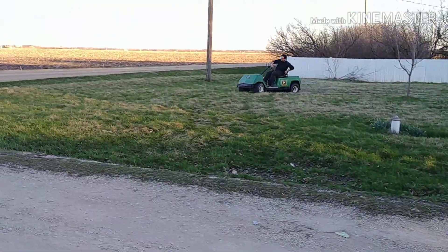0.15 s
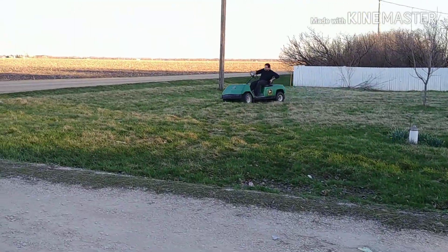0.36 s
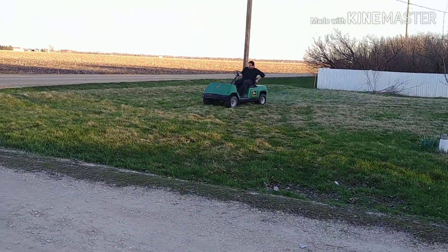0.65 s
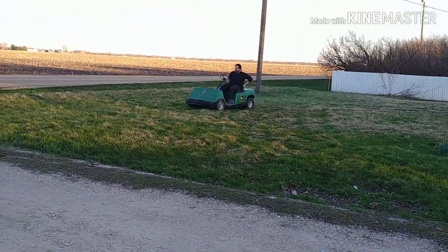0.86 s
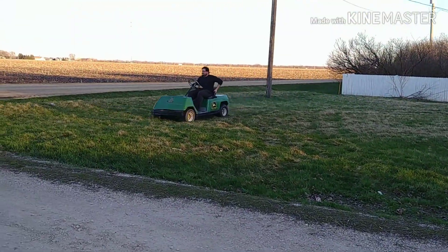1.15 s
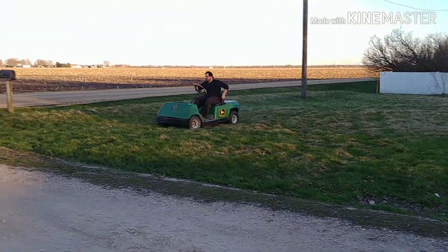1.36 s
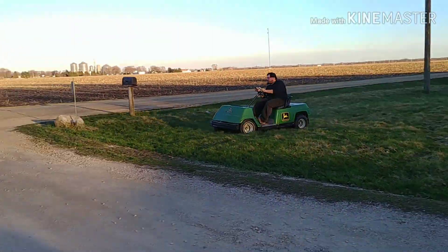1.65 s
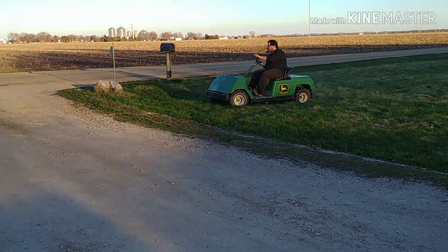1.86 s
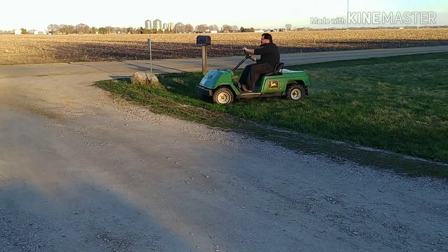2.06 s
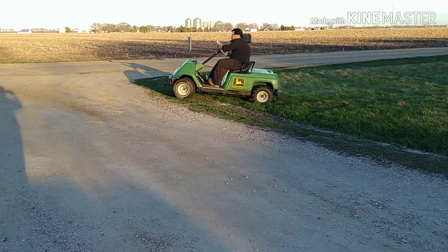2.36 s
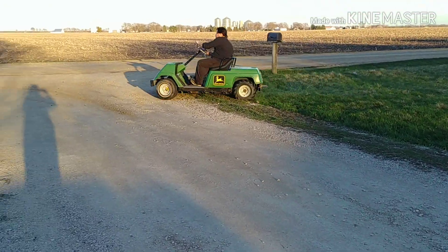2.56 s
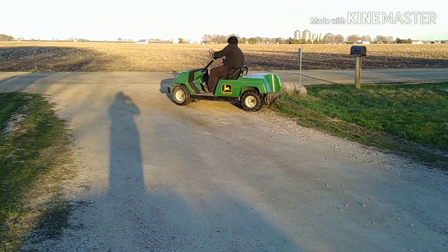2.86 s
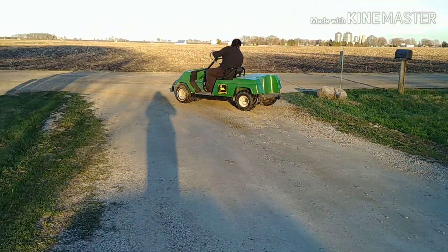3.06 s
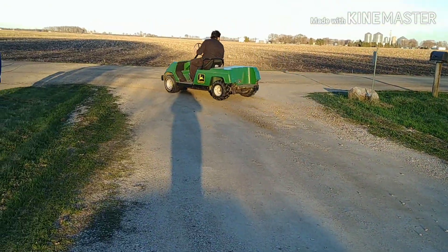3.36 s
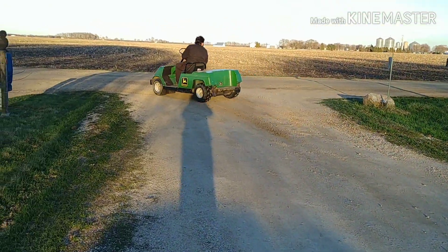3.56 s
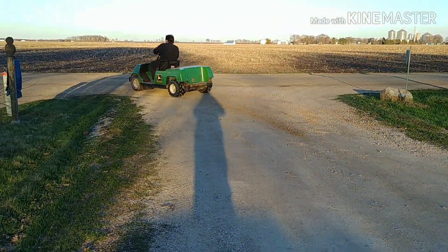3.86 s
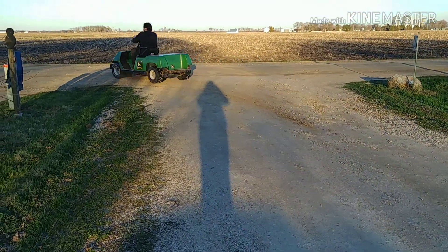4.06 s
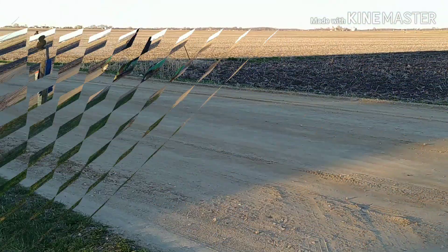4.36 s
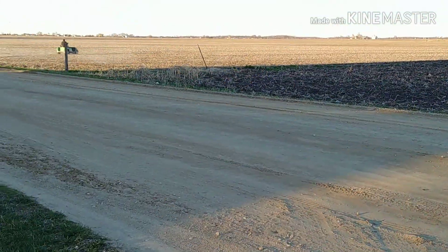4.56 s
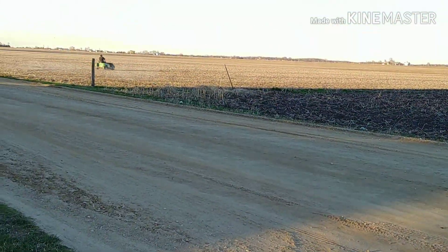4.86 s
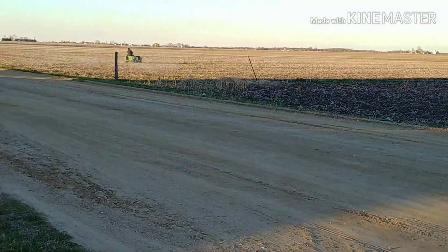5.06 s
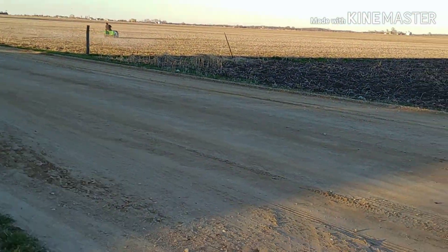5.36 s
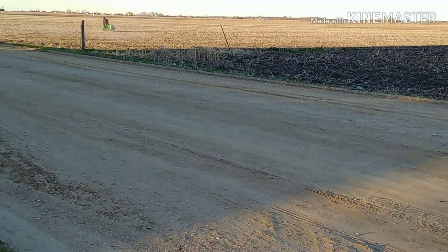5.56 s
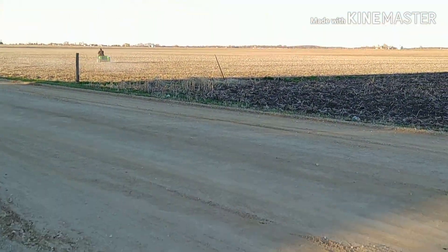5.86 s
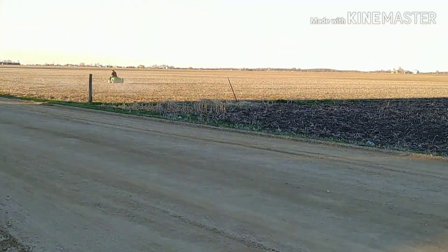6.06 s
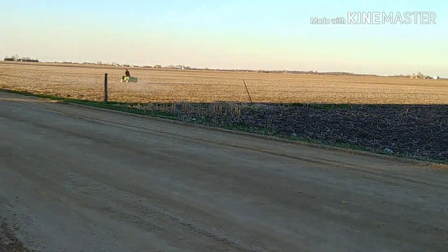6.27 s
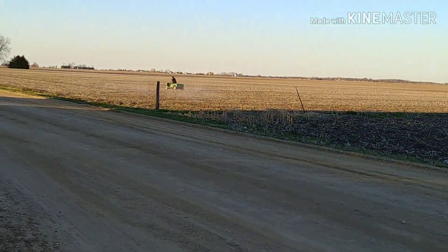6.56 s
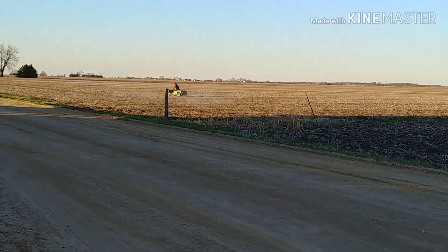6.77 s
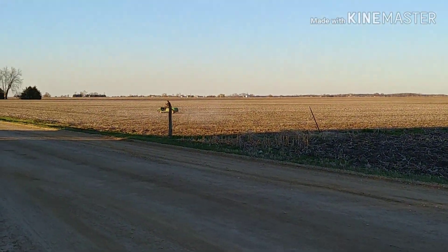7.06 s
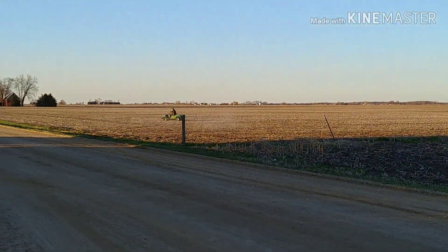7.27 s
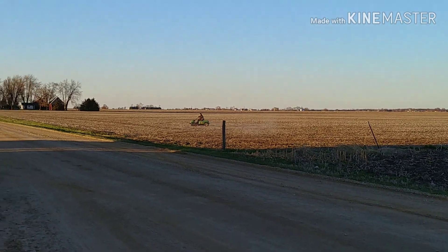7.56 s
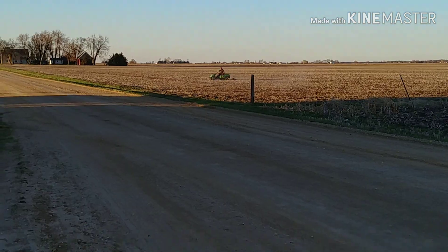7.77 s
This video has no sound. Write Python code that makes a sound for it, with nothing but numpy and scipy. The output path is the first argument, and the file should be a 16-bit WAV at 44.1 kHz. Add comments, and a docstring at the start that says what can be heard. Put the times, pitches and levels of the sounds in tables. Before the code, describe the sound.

Outdoors in open farmland, a small two-stroke cart starts high and raspy, then slows through short throttle blips, with hollow muffler pops between them. Tyres scuff gravel as it turns nearby, then it pulls away, revs climbing. The sound blends into a farther, softer drive: popping as it slows, one long rising pull, a second burst, then coasting with faint pops. A handheld microphone stays put, with a light breeze and early low rumble.

```python
"""On grass and gravel, a two-stroke golf cart is driven hard, then is heard farther off beside a field.
On the throttle its single cylinder fires every turn: sine waves make the note, pulses and noise the rasp.
Off the throttle it coasts on a soft hum; late charges make separate pops, each a snap, a thump and a ring.
Tyres scuff the gravel in short swells of grainy noise, and shaped noise makes a light breeze and a rumble.
The near drive fades into the far one."""
import sys
import numpy as np
from scipy import signal
from scipy.fft import rfft, irfft, next_fast_len
from scipy.io import wavfile
from scipy.ndimage import uniform_filter1d, minimum_filter1d, map_coordinates

SR = 44100
rng = np.random.default_rng(int(sys.argv[2]) if len(sys.argv) > 2 else 0)


def master(y):
    """Save y as 16-bit WAV."""
    cut = np.clip(np.atleast_2d(y).T, -1, 1)
    pcm = np.round(cut * 32767)  # scale
    wavfile.write(sys.argv[1], SR, pcm.astype(np.int16))


N = 348831
FADE_S = 4.75  # from here the far drive takes over

# How fast the crank spins. Each row: time in seconds, speed in turns a second.
NEAR_SPEED = [(0.0, 162.5), (0.12, 129), (0.2, 124), (0.37, 135.7), (0.66, 156.4), (0.98, 114.4),
              (1.2, 108.9), (1.59, 101.4), (1.88, 93.8), (1.92, 99), (2.21, 93), (2.33, 105), (2.46, 117.8),
              (2.57, 95), (2.67, 95.3), (2.84, 91), (2.95, 83.6), (3.1, 85.1), (3.2, 105.4), (3.32, 114),
              (3.54, 89.6), (3.84, 92.5), (4.02, 98.3), (4.29, 108.4), (4.56, 131.5), (4.75, 139.4)]
FAR_SPEED = [(4.75, 95.7), (5.51, 84.67), (6.04, 79.99), (6.3, 101.9), (6.55, 114.5), (6.85, 127.5),
             (6.96, 107), (7.2, 125.2), (7.32, 125.7), (7.56, 101.3), (7.72, 91.5), (7.78, 94.2),
             (7.83, 92.4), (7.91, 99.5)]
# Colour of the muffler's thump. Each row: frequency in Hz, level in dB.
THUMP = [(18, -55.5), (30, -62), (76, 2.5), (194, 2.5), (227, 4), (260, 1.5), (360, -1.5), (468, -16.5),
         (521, -19), (678, -25), (1200, -67.5), (1560, -91), (2640, -120)]


def amp(db):
    """Turn dB into a plain factor."""
    return 10 ** (np.asarray(db) / 20)


def unit(x):
    """Scale a sound to an RMS level of 1."""
    return x / np.sqrt(np.mean(x ** 2) + 1e-20)


def along(points, hz):
    """Read a curve of (Hz, value) points on a log frequency axis."""
    f, v = np.transpose(points)
    return np.interp(np.log(hz + 1), np.log(f + 1), v)


def curves(rows):
    """Give one value per sample for each column after the time."""
    s, *cols = np.transpose(rows)
    return [np.interp(np.arange(N) / SR, s, c) for c in cols]


def wobble(rate):
    """Draw a smooth random curve through rate random points a second."""
    return map_coordinates(rng.standard_normal(int(N * rate / SR) + 4), [np.arange(N) * rate / SR])


def filtered(x, response):
    """Multiply the spectrum of x by a response that depends on frequency."""
    m = next_fast_len(N + SR // 2)
    return irfft(rfft(x, m) * response(np.fft.rfftfreq(m, 1 / SR)), m)[..., :N]


def ring(points, size=8192):
    """Make the ring of a colour after a single tap, peak 1; it falls steeply outside the points."""
    hz = np.fft.rfftfreq(size, 1 / SR)
    closed = [(points[0][0] / 2, -80), *points, (points[-1][0] * 2, -90)]
    # folding the cepstrum makes the ring start at the tap, never before it
    cepstrum = irfft(np.log(amp(along(closed, hz))))
    cepstrum[1:size // 2] *= 2
    cepstrum[size // 2 + 1:] = 0
    h = irfft(np.exp(rfft(cepstrum)))
    return h / np.abs(h).max()


def through(x, points):
    """Let each channel of x ring a colour."""
    return signal.fftconvolve(x, ring(points)[None], axes=1)[:, :N]


def stereo(pair):
    """Mix two unrelated signals into left and right, which grow less alike towards the treble."""
    # Likeness of left and right. Each row: frequency in Hz, likeness from 0 to 1.
    alike = [(30, .6), (80, .96), (200, .99), (500, .96), (1000, .87), (2000, .75), (4000, .2), (9000, .1)]
    turn = lambda hz: np.arccos(np.clip(along(alike, hz), -1, 1)) / 2
    mid, side = filtered(pair, lambda hz: np.array([np.cos(turn(hz)), np.sin(turn(hz))]))
    return np.array([mid + side, mid - side])


def panels(x, t60, count=20, size=1024):
    """Body panels and ground smear each pulse into a noisy tail; the paths change as the cart moves."""
    out, place = np.zeros((2, N + size)), np.linspace(0, count - 1, N)
    for k in range(count):
        # t60: seconds for the tail to fall by 60 dB
        tail = rng.standard_normal((2, size)) * amp(-60 * np.arange(size) / SR / t60)
        near = np.flatnonzero(np.abs(place - k) < 1)
        part = x[near] * np.cos(np.pi / 2 * (place[near] - k))  # fade from one tail to the next
        out[:, near[0]:near[-1] + size] += signal.fftconvolve(part[None], unit(tail), axes=1)
    return out[:, :N]


def open_air(air_db=-42, rumble_db=-50, hiss_db=-72):
    """Shape noise into a light breeze over the fields, a low rumble that sinks, and a faint hiss."""
    # Colour of the breeze. Each row: frequency in Hz, level in dB.
    breeze_colour = [(15, -63), (25, -25.5), (98, -20), (251, -10.5), (374, 6), (456, -12), (556, -4),
                     (1060, -56.5), (3760, -79), (7530, -73), (9420, -70), (12200, -105), (20700, -120)]
    noise = lambda colour: unit(stereo(through(rng.standard_normal((2, N)), colour)))
    course_db, = curves([(0, 25.5), (4, 8), (4.7, -13), (7.9, -14.5)])
    rumble_level = amp(rumble_db + course_db + 0.83 * wobble(4.8))
    rumble = rumble_level * noise([(18, -4.5), (45, -2.5), (120, -3.5)])
    hiss = amp(hiss_db) * noise([(1000, -16.5), (4000, -7), (8000, 9.5), (10000, -4.5), (15000, -12)])
    breeze = amp(air_db + wobble(2.0)) * noise(breeze_colour)
    return breeze + rumble + hiss


def gravel(grainy_db=3):
    """The tyres scuff the gravel in the turn: each scuff is a swell of small stones grinding together."""
    # The scuffs. Each row: middle in seconds, length in seconds, level in dB.
    scuffs = [(2.146, .04, -32.5), (2.356, 0.36, -34.5), (2.583, 0.22, -30.5), (2.731, .07, -31.5)]
    colour = [(2500, -21.5), (4500, -3.5), (6000, 0), (7800, 2.5), (9000, -16.5), (10000, -32), (15000, -28.5)]
    t, swell = np.arange(N) / SR, np.zeros(N)
    for middle, length, db in scuffs:
        swell += amp(db) * np.cos(np.pi * np.clip((t - middle) / length, -.5, .5)) ** 2
    grains = rng.standard_normal((2, N)) * amp(grainy_db * wobble(900))
    return swell * unit(stereo(through(grains, colour)))


def pops(thump_db=-2.0, smear_db=-9, smear_s=.07, snap_db=-5, size=3000):
    """A late charge fires alone: a snap at the port, its scatter, then a thump and a ring of the muffler."""
    # Late charges, single or in a run on every second turn.
    # Each row: start in seconds, level in dB, number of firings.
    late_charges = [(0.223, 5, 2), (0.869, 5.5, 1), (0.942, 5.5, 1), (0.982, -0.5, 1), (1.003, 4, 1),
                    (1.118, 5, 1), (1.165, 1, 1), (1.267, 0.5, 2), (1.445, 0.5, 1), (1.6, -1.5, 1),
                    (1.756, 4, 1), (1.864, 1, 2), (2.04, 5.5, 1), (2.073, 7, 1), (2.213, 9.5, 1),
                    (2.602, 0.5, 2), (2.774, 3, 1), (2.817, -0.5, 1), (2.851, 0, 1), (2.979, -1, 2),
                    (3.016, 3.5, 1), (3.086, -1, 1), (3.447, 6.5, 2), (3.599, 6, 2), (3.754, 6, 1),
                    (4.814, -5.5, 1), (4.969, -7, 2), (5.115, -4.5, 2), (5.149, -1, 1), (5.287, -2.5, 1),
                    (5.297, 0, 1), (5.318, -6, 1), (5.4, -4.5, 2), (5.482, -2, 1), (5.566, -2, 1),
                    (5.603, -2.5, 2), (5.686, -3, 2), (5.747, -5, 2), (5.834, -3, 1), (5.895, -3.5, 2),
                    (5.958, -5, 2), (6.046, -6, 1), (7.453, -7.5, 1), (7.479, -9.5, 1), (7.569, -9, 2),
                    (7.643, -7, 1), (7.743, -7.5, 1), (7.845, -9.5, 1)]
    # The ring and crack carry only a short way.
    # Each row: time in seconds, shell level in dB against the thump, crack level in dB against the charge.
    reach = [(.9, -14, -18), (1.4, -20.5, -22.5), (2.1, -18, -25), (2.6, -4.5, -21), (2.85, -12.5, -15),
             (3, -7.5, -11), (3.7, -15, -12), (4.9, -13.5, -39.5), (5.3, -14, -24), (5.7, -26, -45),
             (7.6, -26.5, -28)]
    # Colours of the near and the far shell's ring, and of the crack. Each row: frequency in Hz, level in dB.
    near_shell = [(560, -26), (720, -7), (870, 0), (1020, -11), (1400, -20), (2050, -19), (2700, -38)]
    far_shell = [(330, -7), (520, 2.5), (680, -3.5), (900, -7), (1100, -20.5), (2000, -28), (2700, -37)]
    crack_colour = [(500, -3), (900, -1.5), (1400, -2), (2100, -1), (2700, -17.5), (4000, -26),
                    (8000, -26.5), (10000, -48.5)]
    repeat_db = -0.5  # added for each further firing of a run
    muffler_s = .001  # the thump comes this much after the snap

    blows, snaps, cracks = np.zeros((1, N)), np.zeros((1, N)), np.zeros((2, N + size))
    fade = amp(-2 - 60 * np.arange(size) / SR / .04)  # the crack falls 60 dB in 0.04 s
    shell_db, crack_db = curves(reach)
    for s, first_db, count in late_charges:
        turn_s = 1 / np.interp(s, *np.transpose(NEAR_SPEED if s < FADE_S else FAR_SPEED))
        for k in range(count):
            at, db = round((s + 2 * k * turn_s) * SR), first_db + k * repeat_db
            blows[0, at + round(muffler_s * SR)] = -amp(db + thump_db)
            snaps[0, at] = amp(db + crack_db[at] + snap_db)
            cracks[:, at:at + size] += amp(db + crack_db[at]) * fade * rng.standard_normal((2, size))
    far = np.arange(N) / SR > FADE_S
    scattered = stereo(panels(blows[0], smear_s))
    heard = blows + amp(smear_db) * unit(scattered) * np.std(blows)  # panels and ground loosen its tail
    # each blow also rings the muffler's shell
    shell = through(heard * ~far, near_shell) + through(heard * far, far_shell)
    body = through(heard, THUMP) + amp(shell_db) * shell
    scatter = stereo(through(cracks, crack_colour)) / np.linalg.norm(ring(crack_colour))
    return body + through(snaps, crack_colour) + scatter


def pulls(rows):
    """The cylinder fires every turn in a pull: give firing (0-1), note, bark and treble lifts, roughness."""
    catch_s, cut_s = 0.013, 0.046  # a pull sets in and dies away
    swell = 0.26  # share of its bark and treble lift that swells towards the middle
    coast_rough = 0.51  # roughness between pulls, 0-1
    t, out = np.arange(N) / SR, np.zeros((5, N))
    for start, end, note_db, bark_db, treble_db, rough in rows:
        on = np.clip(np.minimum((t - start) / catch_s, (end - t) / cut_s) + .5, 0, 1)
        arch = on * (1 - swell + swell * np.sin(np.pi * np.clip((t - start) / (end - start), 0, 1)))
        out += [on, on * note_db, arch * bark_db, arch * treble_db, on * (rough - coast_rough)]
    return *out[:4], np.clip(coast_rough + out[4], 0, 1)


def exhaust_note(turns, hz, firing, away, pipe, coast, shade, rough, scatter_db=1.5, stray_db=-23, count=9):
    """Sum the pipe's low orders (multiples of the crank speed), each unsteady, with a little by stray paths."""
    shared, note, side = wobble(90), np.zeros(N), np.zeros(N)
    for k in range(1, count + 1):
        level = firing * amp(along(pipe, k * hz)) + (1 - firing) * amp(along(coast, k * hz))
        unsteady_db = scatter_db * rough * (shared + 2.67 * wobble(110))
        level = level * np.sqrt(2) * amp(away * along(shade, k * hz) + unsteady_db)
        # the pipe delays its low orders most
        phase = 2 * np.pi * k * turns + np.pi * k * k / count + np.pi / 3
        note += level * np.sin(phase)
        side += level * np.cos(phase) * amp(stray_db) * wobble(36)
    return np.array([note + side, note - side])


def port_blasts(turns, rough, scatter_db=2.0, gate_fall_db=7, ring_s=0.059):
    """Each opening of the port gives a sharp pulse and a dying puff of turbulent gas."""
    starts = np.flatnonzero(np.diff(np.floor(turns)) > 0)
    # share each pulse between two samples, so it falls at its exact moment
    late = (np.ceil(turns[starts]) - turns[starts]) / (turns[starts + 1] - turns[starts])
    sizes = amp(scatter_db * rough[starts] * rng.standard_normal(len(starts)))
    pulses = np.bincount(starts, sizes * (1 - late), N) + np.bincount(starts + 1, sizes * late, N)
    gate = amp(-gate_fall_db * (turns % 1)) * np.interp(np.arange(N), starts, sizes)
    return unit(panels(pulses, ring_s)), unit(gate * rng.standard_normal((2, N)))


def engine(speed, pull_rows, way, pipe, coast, shade, bark_colour, hiss_colour, turbulence, hiss_db, chuff_db):
    """The exhaust note and the bright noise of the port both follow the crank and are changed by each pull."""
    # Colour of the rasp, between bark and hiss. Each row: frequency in Hz, level in dB.
    rasp_colour = [(1200, -33.5), (1600, -0.5), (2050, 3), (2350, -2), (2600, -8), (2980, -4.5),
                   (3500, -15), (4600, -57)]
    bark_slope, rasp_slope, hiss_slope = 9.5, 11, 19  # dB per doubling of speed: faster is brighter
    turbulence_slope = .3  # share per doubling of speed: faster gas breaks up more

    hz, = curves(speed)
    note_db, bark, treble, away = curves(way)
    firing, push_db, bark_lift, treble_lift, rough = pulls(pull_rows)
    octaves = np.log2(hz / 100)  # doublings of speed above 100 turns a second
    bark = bark + bark_lift + bark_slope * octaves
    rasp = treble + treble_lift + rasp_slope * octaves
    hiss = treble + treble_lift + hiss_slope * octaves + hiss_db
    breathy = np.clip(turbulence + 1.12 * rough + turbulence_slope * octaves, 0, .95)
    turns = np.cumsum(hz) / SR + .016 * rough * wobble(70)  # rough running is uneven in time
    pulses, puffs = port_blasts(turns, rough)

    def blast(share, colour):
        """Mix pulses with a share of turbulent puffs, then colour them."""
        return unit(through(np.sqrt(1 - share) * pulses + np.sqrt(share) * puffs, colour))

    # the higher the band, the more of it is turbulence
    bright = amp(bark) * blast(breathy ** 2, bark_colour)
    bright += amp(rasp) * blast(breathy, rasp_colour)
    bright += amp(hiss) * blast(np.sqrt(breathy), hiss_colour)
    # uneven burning also stirs the muffler between the orders
    bright += amp(rasp + chuff_db) * rough * blast(0.92, THUMP)
    note = amp(note_db + push_db) * exhaust_note(turns, hz, firing, away, pipe, coast, shade, rough)
    return note, stereo(bright)


def placed(x):
    """The cart's bearing sets how much louder one ear is and which ear hears it first."""
    # Each row: time in seconds, left over right in dB, lag of the left in milliseconds.
    bearing = [(0, 2, 0.092), (1.7, 0.36, 0.044), (3, 1, -0.045), (4.7, 1, 0.031), (5.1, 2, -0.14),
               (7.9, 2.5, -0.0047)]
    left_db, lag_ms = curves(bearing)
    ears = []
    for ear, sign in zip(x, (.5, -.5)):
        moment = np.arange(N) - sign * lag_ms * SR / 1000
        ears.append(amp(sign * left_db) * map_coordinates(ear, [moment]))
    return np.array(ears)


def scene():
    """Fade the near drive into the far one, add pops and gravel, and set all a little left in open air."""
    # The near engine's speed as it fades, still gaining. Each row: time in seconds, speed in turns a second.
    run_out = [(5.02, 166)]
    # Pulls on the throttle. Each row: start and end in seconds, note change in dB, bark lift in dB,
    # treble lift in dB, roughness from 0 to 1.
    near_pulls = [(-.05, 0.075, 4, 5.5, 8.5, 0.3), (0.245, 0.659, -2.5, 10.5, 11, 0.39),
                  (0.705, 0.849, -3.5, 5.5, 2, 0.5), (1.241, 1.289, 0.5, -1, 2.5, .4),
                  (1.431, 1.495, 0, 7.5, 5, 0.5), (1.566, 1.6, 2, 10.5, 7.5, 0.5),
                  (1.704, 1.793, -2.5, 7, 3, 0.5), (1.862, 1.926, -1.5, 9, 6, 0.8),
                  (2.025, 2.114, -3, 9.5, 3, 0.9), (2.207, 2.424, 3, 12, 10.5, .3),
                  (2.556, 2.638, -3.5, 9, 11.5, 0.4), (2.74, 2.812, 3, 11.5, 6, 0.3),
                  (3.089, 3.337, -2, 9.5, 11, .4), (3.422, 3.48, 2, 12, 8, 0),
                  (3.602, 3.663, 1.5, 9.5, 10.5, 0.6), (3.752, 5.104, -1.5, 10.5, 7, 0.28)]
    far_pulls = [(6.046, 6.85, 0.023, 10.5, 3.66, .27), (6.965, 7.323, 0.012, 8.2, 6, 0.2)]
    # The cart's way past the listener. Each row: time in seconds, base level of the note in dB,
    # of the bark in dB, of the treble in dB, how far it is turned away from 0 to 1.
    near_way = [(.15, -7, -33, -29, 0.32), (0.501, 4.5, -36.5, -32.5, 0), (1.049, -2.5, -34.5, -34, 0),
                (1.5, -2.5, -38.5, -40, 0.18), (2, -2.5, -37.5, -32.5, 0.88), (2.5, 0.5, -27.5, -34, 0),
                (2.951, -0.5, -25.5, -32.5, 0.02), (3.352, 0.5, -24.5, -29, 0.5),
                (3.701, -2, -29, -32.5, 1), (4.101, 1, -29.5, -34.5, 1), (4.349, -6.5, -38.5, -34, 0.99),
                (4.699, -17.5, -44.5, -39.5, 0.9), (5.019, -29, -51.5, -56, 0.7)]
    far_way = [(4.8, -2.5, -56, -62.5, 0.028), (5.198, 1, -44.5, -53, 0.045), (6, -2.5, -51.5, -59, 0.018),
               (6.4, 2.5, -46.5, -49, 0), (6.8, 2, -43, -42.5, 0.73), (7, -2, -47.5, -52, 0.82),
               (7.248, 1, -43, -42, 0.81), (7.548, -5.5, -47, -56, 0.97), (7.9, -4, -49.5, -55.5, 1)]
    # Level of the orders as they glide through the pipe's resonances, firing (pipe) and coasting (coast).
    # Each row: frequency in Hz, level in dB.
    near_pipe = [(85, -17), (105, -13), (150, -11), (180, -16), (210, -10.5), (300, -9.5), (350, -10.5),
                 (400, -13.5), (450, -23), (510, -27), (570, -48.5), (750, -37.5), (950, -61)]
    near_coast = [(85, -32.5), (105, -21.5), (135, -17), (170, -21.5), (220, -12.5), (270, -15.5),
                  (300, -20.5), (350, -26.5), (420, -30), (560, -48), (900, -57.5)]
    far_pipe = [(80, -19.5), (105, -14), (125, -18), (165, -20), (205, -16.5), (240, -14.5), (275, -22.5),
                (310, -25.5), (360, -18.5), (420, -26), (480, -30.5), (540, -26), (650, -36), (750, -39.5),
                (1100, -56)]
    far_coast = [(80, -28.5), (200, -27), (235, -24.5), (275, -27.5), (310, -29.5), (355, -40), (440, -41),
                 (530, -40.5), (900, -65.5)]
    # What turning fully away does to the orders. Each row: frequency in Hz, change in dB.
    near_shade = [(250, 2), (295, -3.5), (345, -23), (385, -1.5), (480, 9), (560, -6.5)]
    far_shade = [(200, 2.5), (250, 6.5), (300, -2.5), (365, -10.5), (440, -13.5), (500, -6), (550, -7.5),
                 (650, -23.5)]
    # Colours of the port's bark and hiss. Each row: frequency in Hz, level in dB.
    near_bark = [(430, -17.5), (540, -5), (680, -10), (850, 0.5), (1100, -4.5), (1380, -6), (1600, -13),
                 (2000, -31)]
    near_hiss = [(2800, -43), (3700, 3), (5000, 3.5), (6500, 1), (7800, 2), (8800, -8), (10000, -32),
                 (14500, -23.5), (15700, -31)]
    far_bark = [(420, -22.5), (560, 0.5), (660, -4), (820, -11.5), (980, -10.5), (1150, -15.5), (1370, -7),
                (1600, -15), (2000, -41.5)]
    far_hiss = [(2400, -22), (2900, -3), (3500, 6), (4100, 1), (4800, 2), (5900, -14), (7800, -16),
                (9000, -28), (14500, -28), (15700, -32)]

    near_note, near_bright = engine([*NEAR_SPEED, *run_out], near_pulls, near_way, near_pipe, near_coast,
                                    near_shade, near_bark, near_hiss, turbulence=.1, hiss_db=-14.5, chuff_db=8)
    far_note, far_bright = engine(FAR_SPEED, far_pulls, far_way, far_pipe, far_coast,
                                  far_shade, far_bark, far_hiss, turbulence=.5, hiss_db=-9.5, chuff_db=-2.5)
    # the far drive's bright noise comes in after its note
    near, far, far_top = curves([(4.5, 1, 0, 0), (FADE_S, 1, .7, 0), (4.95, .7, 1, .1), (5.05, 0, 1, 1)])
    drive = near * (near_note + near_bright) + far * far_note + far_top * far_bright
    return placed(drive + pops() + gravel()) + open_air()


def record(dry, low_cut_hz=48, top_hz=15700, size=60):
    """A fast limiter turns down the peaks; then deep bass is weakened and all above top_hz is removed."""
    needed = 1 / np.maximum(np.abs(dry).max(axis=0), 1)
    gain = uniform_filter1d(minimum_filter1d(needed, 2 * size), size)
    return filtered(dry * gain, lambda hz: (hz < top_hz) * hz ** 2 / np.hypot(hz ** 2, low_cut_hz ** 2))


dry = scene()
out = record(dry)
master(out)
```